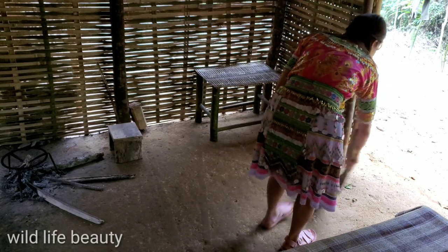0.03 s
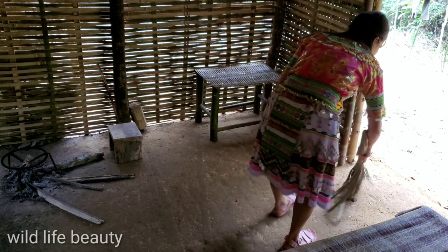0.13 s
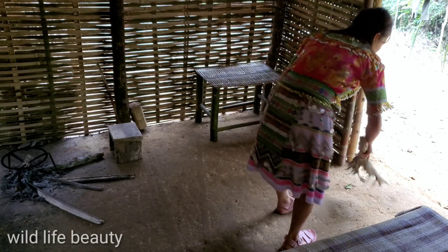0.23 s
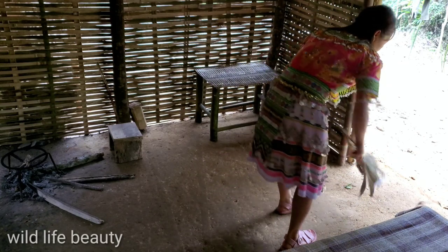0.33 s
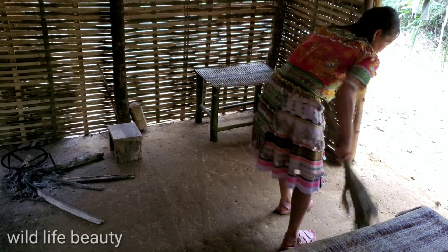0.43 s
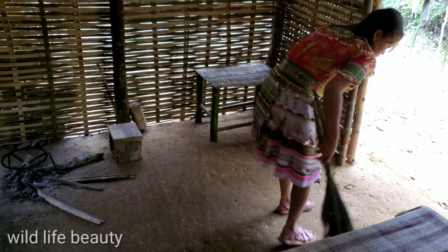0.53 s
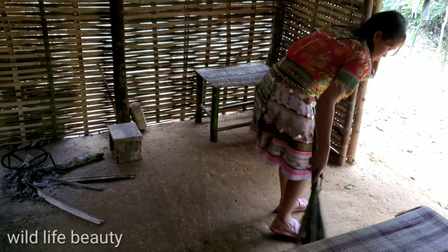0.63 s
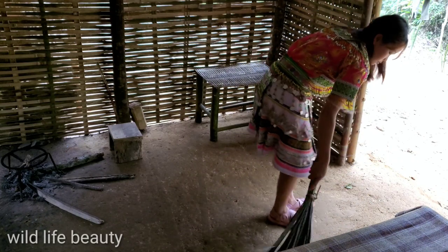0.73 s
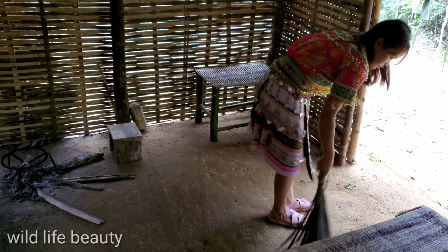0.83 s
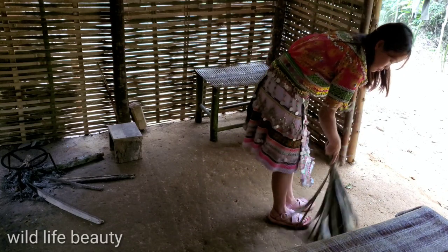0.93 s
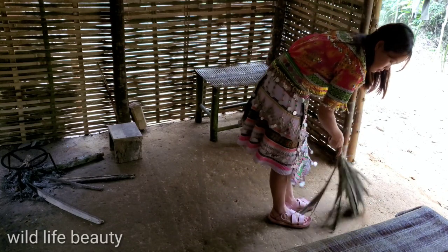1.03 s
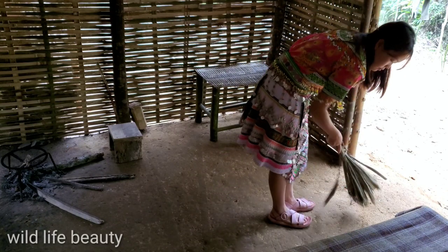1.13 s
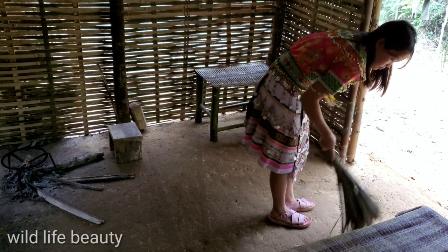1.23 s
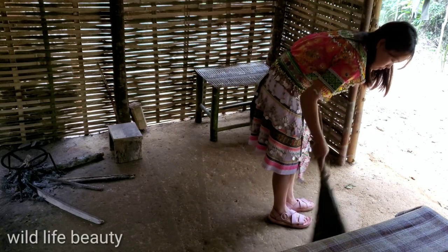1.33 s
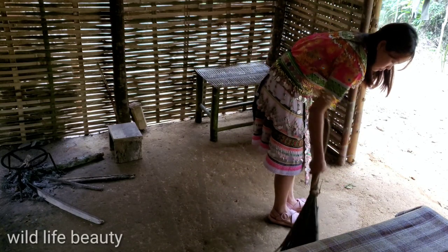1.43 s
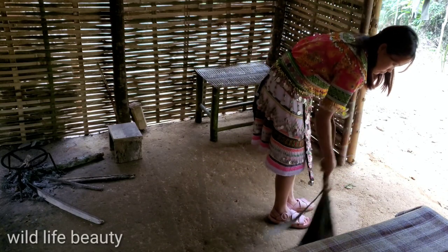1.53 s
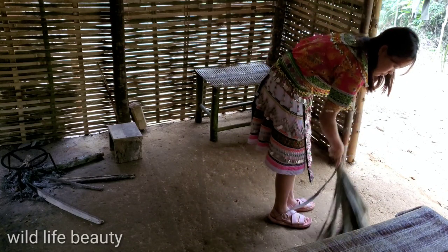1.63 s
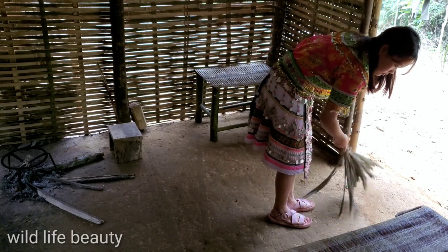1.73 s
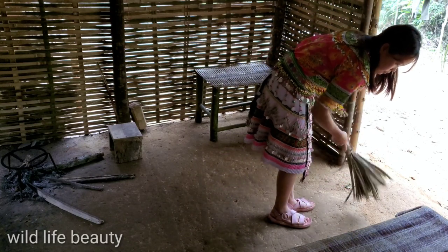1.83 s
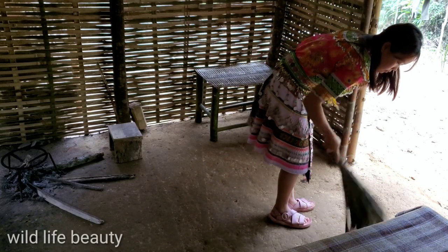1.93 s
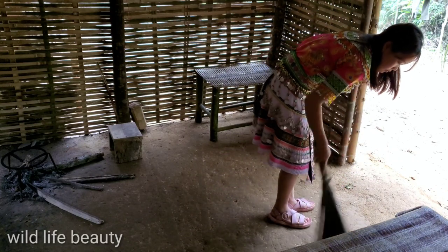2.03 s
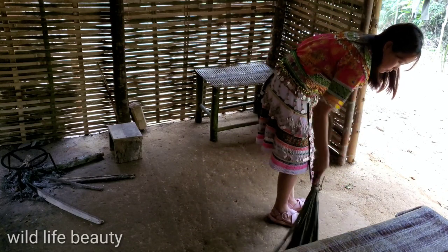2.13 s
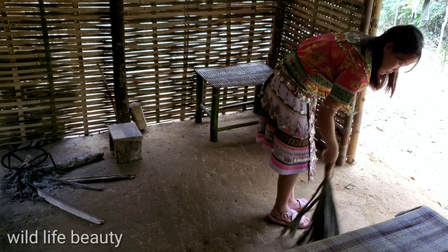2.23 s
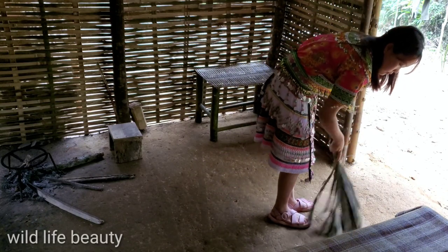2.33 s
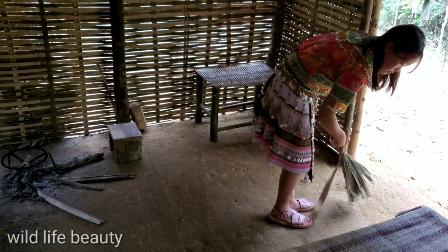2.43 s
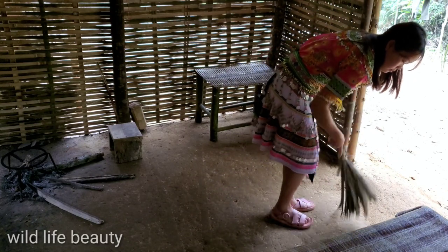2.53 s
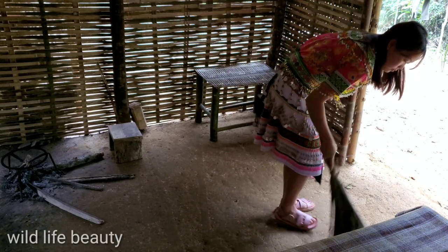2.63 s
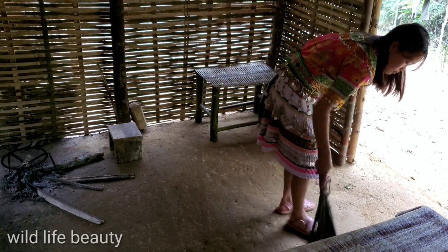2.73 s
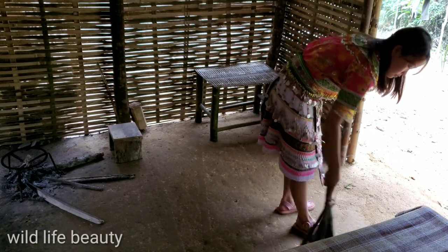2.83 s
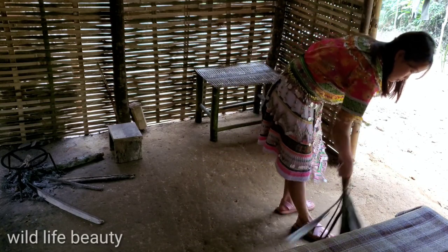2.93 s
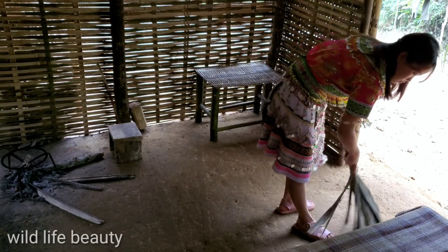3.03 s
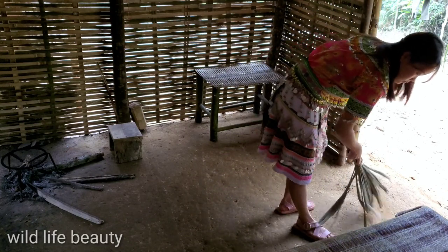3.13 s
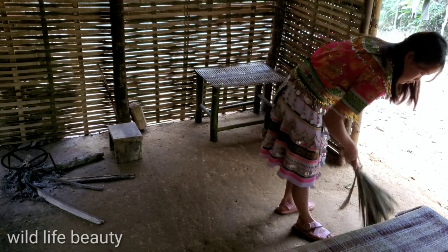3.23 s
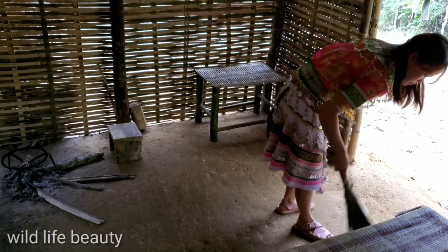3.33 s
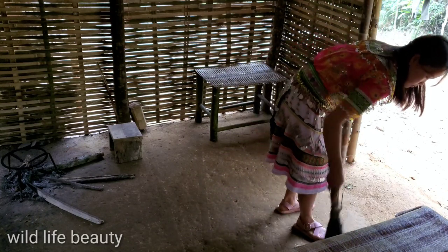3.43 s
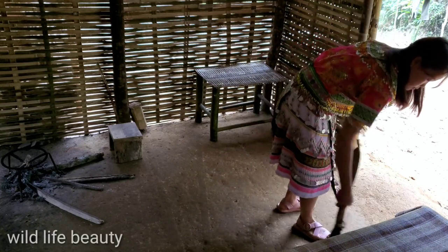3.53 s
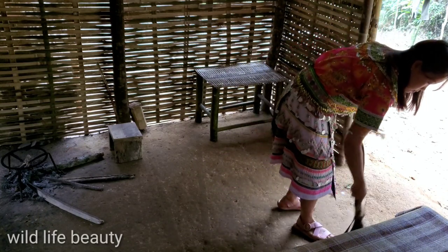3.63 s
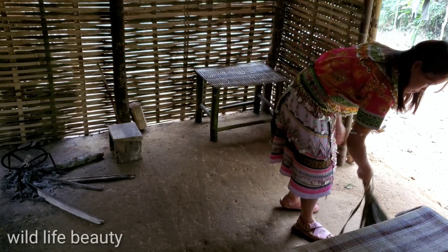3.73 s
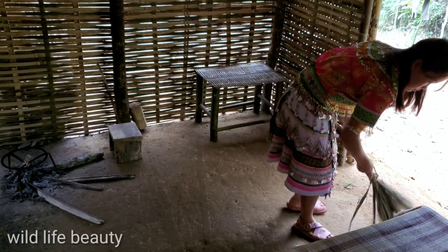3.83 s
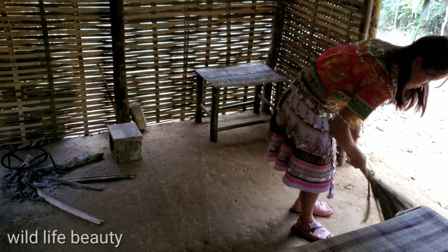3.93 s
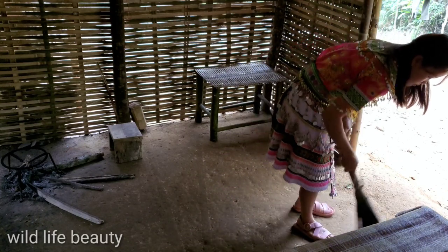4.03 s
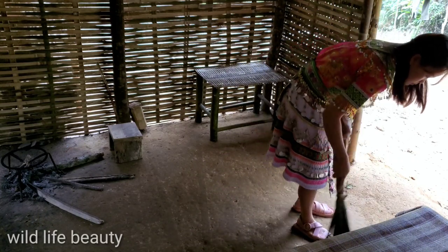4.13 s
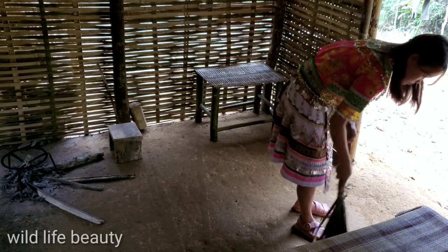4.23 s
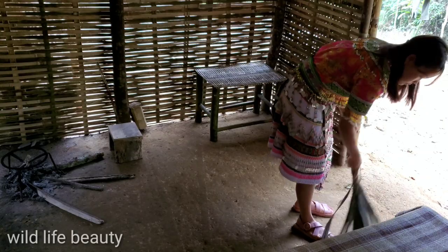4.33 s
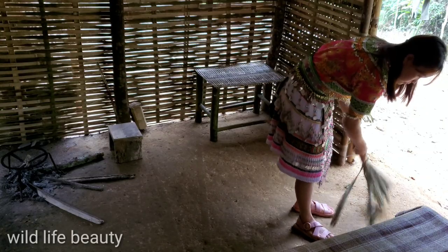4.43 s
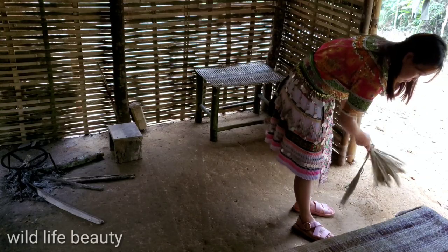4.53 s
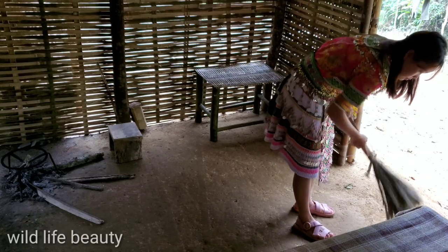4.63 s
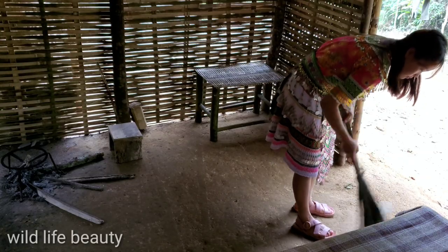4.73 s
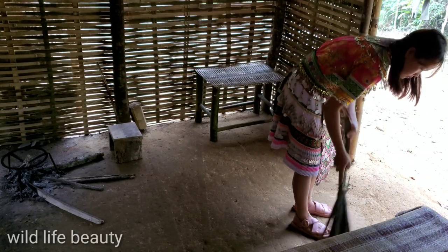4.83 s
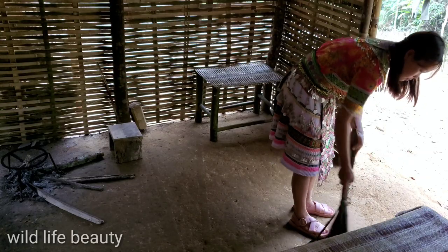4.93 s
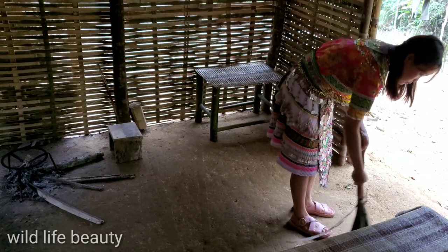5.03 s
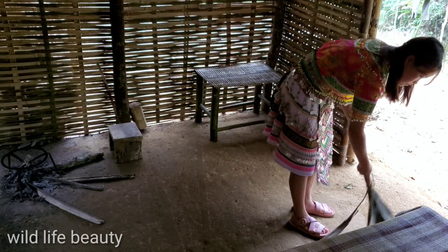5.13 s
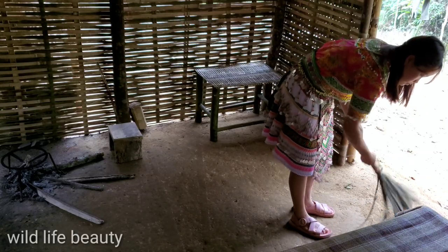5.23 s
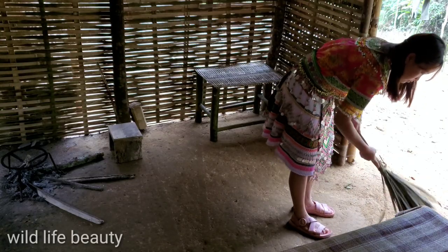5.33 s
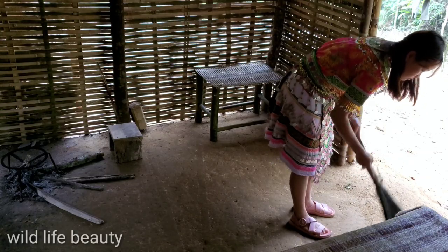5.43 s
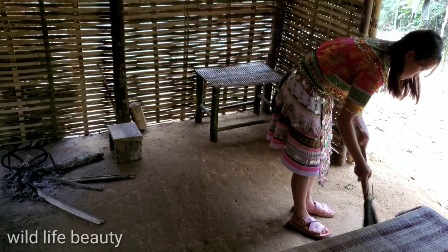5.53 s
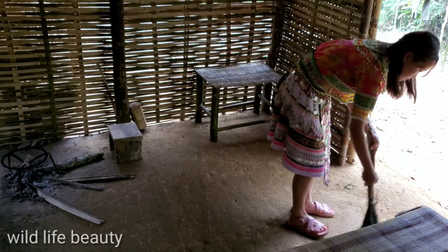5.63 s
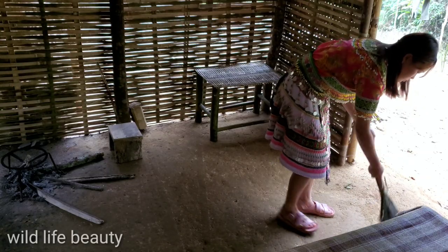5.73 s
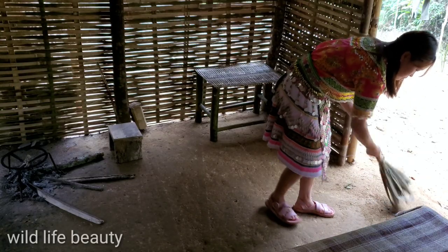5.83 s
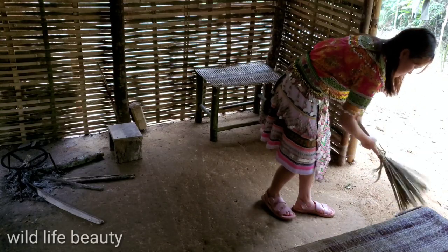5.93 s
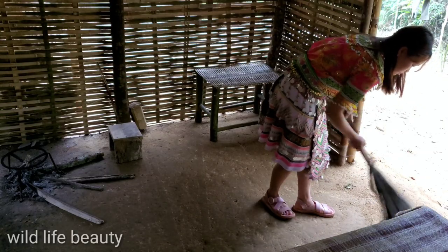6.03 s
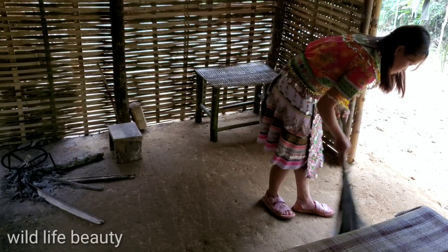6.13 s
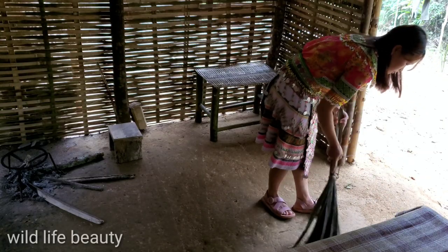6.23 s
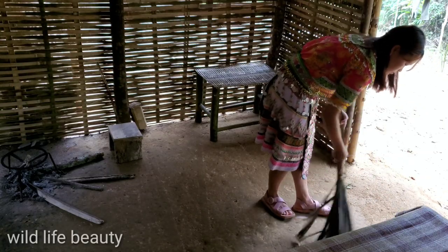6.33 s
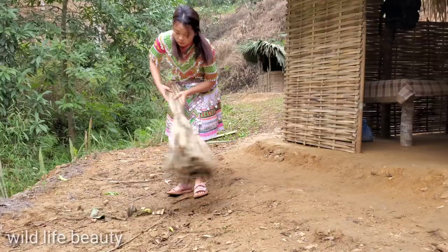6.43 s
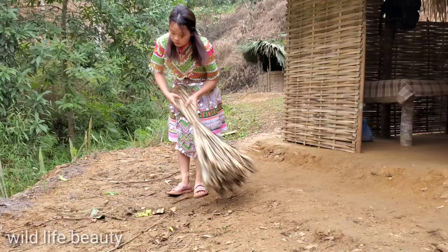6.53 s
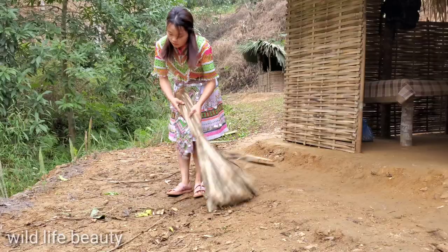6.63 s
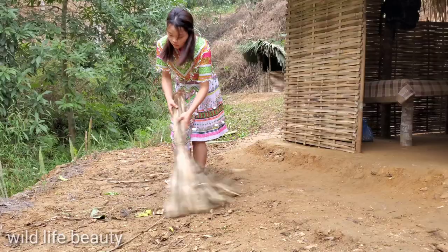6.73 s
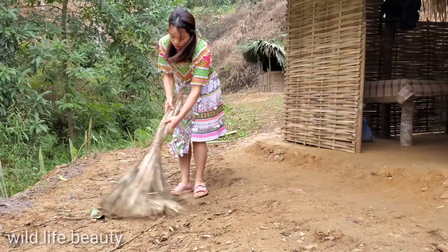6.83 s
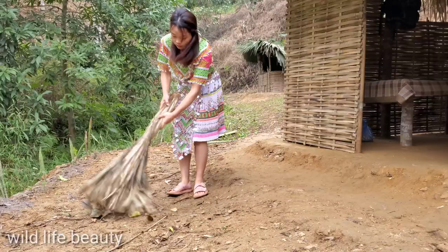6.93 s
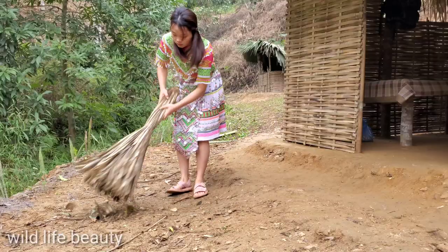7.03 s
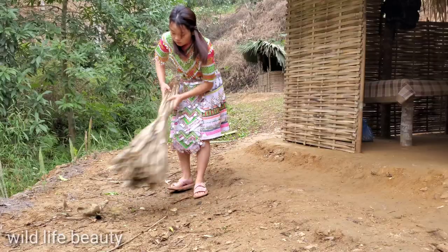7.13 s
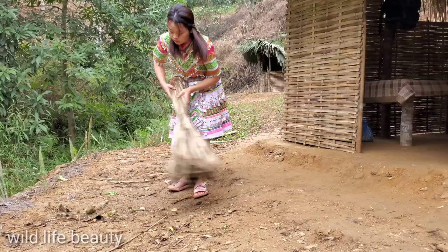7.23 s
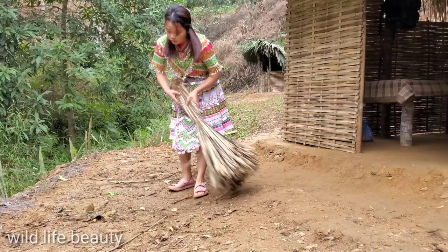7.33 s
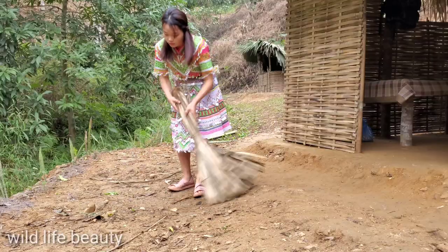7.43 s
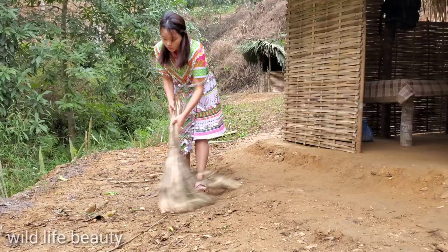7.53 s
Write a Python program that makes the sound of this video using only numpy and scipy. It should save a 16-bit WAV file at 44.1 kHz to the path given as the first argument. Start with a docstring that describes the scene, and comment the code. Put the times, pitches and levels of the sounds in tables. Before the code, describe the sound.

Close stereo sound in a small woven hut: a soft grass broom brushes packed dirt about every 0.7 seconds. Each swish swells and eases, often ending in a crackly flick with a soft thud. Between strokes cloth rustles and tiny metal spangles shimmer faintly. After 6.6 seconds, two heavier, rougher sweeps follow in an open yard, with clod crunches and dull footfalls over quiet outdoor air.

```python
'''A grass broom sweeps packed dirt: steady strokes in a bamboo hut, then two with a bigger broom in the yard.
Each stroke is noise and tiny clicks shaped by the push: it lands, swells, eases off and lifts.
Straws often snag near the end of a hut stroke and spring free with a flick: a spray of clicks and a thud.
Between strokes the skirt rustles (soft noise) and its metal spangles shimmer (many short rings).
In the yard feet pad on the earth (short low tones); quiet outdoor noise lies under everything.'''
import sys
import numpy as np
from scipy import signal
from scipy.fft import rfft
from scipy.io import wavfile
from scipy.ndimage import uniform_filter1d

SR = 44100
rng = np.random.default_rng(int(sys.argv[2]) if len(sys.argv) > 2 else 0)


def generate_wav(sig):
    """Save sig (samples, or channels by samples) to the path in sys.argv[1] as 16-bit PCM at SR."""
    pcm = np.round(np.clip(np.atleast_2d(sig).T, -1, 1) * 32767).astype(np.int16)
    wavfile.write(sys.argv[1], SR, pcm)


N = 334719
TIME = np.arange(N) / SR  # seconds

# Levels in these tables are settings; the functions below may shift them.
# Broom strokes, or a brief second contact within one: [start t/s, landing t/s, time to hardest push t/s,
# length t/s, lifting t/s, level/dB, easing after the push level/dB, low scrape level/dB,
# extra scrape on landing level/dB, fizz level/dB]
HUT_STROKES = [ (-0.04, 0.027, 0.16, 0.24, 0.16, -37.5, 3.5, -7.5, 0, -6.5),
               (0.824, 0.026, 0.043, 0.32, 0.14, -38, 4, -1, 2.5, -6),
               (1.517, 0.087, 0.15, 0.27, 0.14, -36, 5.5, -3, 1, -6),
               (2.188, 0.045, 0.1, 0.31, 0.13, -38.5, 3, -4, 6.5, -6),
               (2.888, 0.025, .12, 0.32, 0.12, -38.5, 4, -1.5, 3.5, -5),
               (3.595, 0.058, 0.14, 0.34, 0.13, -37.5, 9, -1, 4.5, -6),
               (4.257, 0.037, 0.14, 0.29, 0.14, -37, 7.5, -3.5, 4.5, -6),
               (4.945, 0.044, 0.22, 0.4, 0.068, -40, 3.5, -2.5, -1, -6),
               (5.609, .095, 0.12, 0.23, 0.045, -39, -1, -3, 7, -7.5),
               (5.848, 0.022, 0.085, .11, 0.18, -46.5, 6, -6, -1, -3),
               (6.253, 0.074, 0.072, .26, 0.11, -43, 0, 1, -11, -6), ]
YARD_STROKES = [ (6.617, .04, 0.14, .485, 0.048, -40, 2.6, -5, 4, -7),
                (6.804, .025, .03, 0.064, 0.05, -43, 3.4, 3.5, 2, -2),
                (7.416, 0.037, 0.14, 0.34, .1, -37.5, 2.6, -4.5, -1.5, -8), ]
# Bent straws spring free: [t/s, level/dB, bass thud against the spray level/dB, length t/s]
FLICKS = [(1.148, -28, -27, 0.046), (1.799, -24.5, -30, 0.036), (2.482, -30, -37, 0.026),
          (3.1842, -28.5, -48, 0.037), (3.904, -27, -26, 0.051), (4.5288, -25.5, -34, 0.041)]
# A single straw or spangle snaps: [t/s, level/dB, time to fall 60 dB t/s]
TICKS = [(0.303, -32, 0.03), (0.3082, -25, 0.047), (0.466, -35, 0.04), (0.694, -34, 0.04),
         (0.732, -32, 0.04), (1.231, -29, 0.056), (1.366, -19.5, 0.035), (2.259, -17.5, 0.079),
         (3.351, -43, 0.036), (4.09, -34, 0.043), (4.663, -34, 0.044), (7.1931, -31, 0.04)]
# The broom catches on clods in the yard: [t/s, level/dB, time to fall 60 dB t/s]
CLODS = [(6.636, -34.5, 0.08), (6.827, -27, 0.079), (7.099, -46, 0.08), (7.417, -32.5, 0.07),
         (7.446, -30, 0.059)]
# Soft footfalls: [t/s, level/dB, f/Hz, time to fall 60 dB t/s]
STEPS = [(6.925, -57, 72.4, 0.22), (7.054, -41, 135, 0.031), (7.189, -39.5, 138, 0.029),
         (7.218, -52, 120, .05), (7.436, -49.5, 90, 0.082), (7.505, -62, 70, .08)]
# The skirt swings as the broom returns: [start t/s, length t/s, spangles level/dB, cloth level/dB,
# extra rustle of reaching for the next stroke level/dB]
SWINGS = [ (0.35, 0.43, -48.5, -61, 5), (1.217, 0.16, -47.5, -62, 4), (1.885, 0.16, -54, -59.5, 3),
          (2.58, 0.23, -55, -62.5, 6.5), (3.27, 0.28, -48, -60.5, 5.5), (3.993, 0.22, -54.5, -60, 6.5),
          (4.663, 0.24, -57.5, -61, 7), (5.392, 0.22, -61, -63.5, 6), (5.99, 0.27, -58.5, -63.5, 5.5),
          (7.177, .23, -56.5, -57.5, 1.5), ]

# How strong each pitch is in a sound: [f/Hz, level/dB]
HUT_DIRT = [(40, -39), (100, -18), (170, -6), (300, -5), (500, -3.5), (700, 1.5), (1000, -1), (1400, -0.2),
            (2200, -1.5), (2900, 1.5), (3700, -1), (6000, -5), (12000, -10), (15500, -13)]
YARD_DIRT = [(30, -34), (80, -19), (150, -13), (220, -7.5), (300, -8), (600, 2.5), (1000, -3), (1450, 2),
             (2000, -6), (2400, -8), (4200, -3.5), (6700, -12), (12000, -12.5), (15500, -16.5)]
FLICK_SPECTRUM = [(60, -36.5), (160, -0.5), (320, -5.5), (500, -13.5), (1000, -6), (1600, -4.5), (2700, 0),
                  (4000, 0), (6000, -2), (10000, -4.5), (15500, -5)]
TICK_SPECTRUM = [(200, -26), (1500, -16), (3000, 0), (7000, -2), (11000, 0.5), (15500, 1.5)]
CLOTH_SPECTRUM = [(100, -13), (300, 2.5), (700, 1), (1000, -4), (2500, 1), (4500, 1), (6500, -2.5),
                  (11000, -2), (15500, -5)]
AIR_SPECTRUM = [(25, -25), (50, -9), (75, 4), (130, -5.5), (190, 0), (300, 5), (420, -9), (580, -5),
                (710, 4), (950, -4), (1600, -0.5), (3000, -7), (7000, -9.5), (15500, -7.5)]
# Pitches that the hut and the yard lift or weaken in the scrape: [f/Hz, width f/Hz, level/dB]
HUT_COLOUR = [(196, 37, 6), (252, 37, -21), (303, 36, 11.5), (386, 33, -19.5), (432.4, 15, 7.5),
              (502, 30, -3.5), (576, 33, 6.5), (810, 33, 4), (930, 150, -3), (2600, 90, 2)]
YARD_COLOUR = [(400, 46, 5), (480, 32, -9), (706, 50, -2.5), (840, 87, 4), (1050, 70, -2.5),
               (1250, 95, 4.5), (1930, 120, 5.5), (3160, 70, 2)]
# Ring of the spangles: [f/Hz, scale of the spread among them f/Hz, level/dB, time to fall 60 dB t/s]
SPANGLE_MODES = [(9450, 420, -4, 0.067), (11930, 1200, -4.5, 0.011), (14400, 700, -2.5, .004)]
# How alike left and right are, from 0 to 1: [f/Hz, likeness]
HUT_SAME = [(60, 0.77), (130, 1), (290, 0.99), (640, 0.79), (1400, 0.35), (3000, 0.05), (15000, 0.025)]
YARD_SAME = [(60, 0.84), (130, 0.85), (290, 0.97), (640, 0.85), (1400, 0.3), (3000, 0.038), (15000, .05)]
# Bands of the scrape, the swish and the fizz: [lowest f/Hz, highest f/Hz]
BANDS = [(400, 1800), (2200, 8000), (10500, 15500)]
# How much each pitch follows the pressure, and the fine tips: [f/Hz, share]
SCRAPE_SHARE = [(100, 0.18), (300, 0.53), (600, 0.94), (1500, 0.71), (2600, 0.044), (4500, 0)]
FIZZ_SHARE = [(3500, -0.34), (6000, 0.21), (11000, 1)]
# How much each pitch takes the colour of the spot of ground: [f/Hz, share]
SPOT_SHARE = [(1500, 0.9), (5000, 0.35)]

HUT_T60 = 0.16  # seconds for the hut's echo to fall 60 dB
EDGE_HZ = 15700  # top of the final frequency range
HUT_LAG_S, YARD_LAG_S = -.00017, .00004  # how much later the right side hears the broom (minus: earlier)
TOUCH_DB, LIFT_DB = 21, 24.5  # how quiet a stroke's first touch is; fall over one lifting time
UNLOAD_S = 0.15  # time for the hand to take its weight off the broom after the push
BITE_S = 0.079  # how fast the stems' bite into the dirt fades after landing
STROKE_SPAN_S = .65  # each stroke is computed for this long
SNAG_DB, SNAG_S = 4, .02  # depth and time of the scrape's stall before a flick
SPANGLE_BUILD_DB = 2.5  # rise of the spangles up to the middle of a swing
CLOTH_SLACK_DB = 5  # fall of the cloth from the start of a swing to its middle


def gain_of(db):
    """Turns decibels into a multiplier."""
    return 10 ** (np.asarray(db) / 20)


def evened(x):
    """Brings a sound to an average (rms) strength of 1."""
    return x / np.sqrt(np.mean(x ** 2) + 1e-20)


def read(points, hz):
    """Reads a curve between its points, with pitch on a logarithmic scale."""
    f, value = np.transpose(points)
    return np.interp(np.log(hz + 1), np.log(f + 1), value)


def add(mix, s, sound):
    """Adds a stereo sound at time s, or at the very start if s is negative."""
    part = mix[:, max(round(s * SR), 0):][:, :sound.shape[1]]
    part += sound[:, :part.shape[1]]


def coloured(x, points):
    """Shapes a short sound with a spectrum and evens its strength."""
    size = x.shape[-1]
    gains = gain_of(read(points, np.fft.rfftfreq(size, 1 / SR)))
    return evened(np.fft.irfft(rfft(x) * gains, size))


def coloured_by(x, points):
    """Filters a whole layer with gains in dB, without evening it."""
    size = 2 ** 19
    gains = gain_of(read(points, np.fft.rfftfreq(size, 1 / SR)))
    return np.fft.irfft(rfft(x, size) * gains)[:, :N]


def grit(size, per_s, spread_db, share):
    """Makes three streams of tiny stick-slip clicks of uneven size over a bed of countless smaller ones."""
    sizes = gain_of(spread_db * np.minimum(rng.exponential(1, (3, size)), 4))
    signs = rng.choice([-1, 1], (3, size))
    clicks = sizes * signs * (rng.random((3, size)) < per_s / SR)
    share = np.clip(share, 0, 1)
    bed = rng.standard_normal((3, size))
    return np.sqrt(share) * evened(clicks) + np.sqrt(1 - share) * bed


def pair(streams, same, lag_s):
    """Makes stereo: one stream reaches both sides, shifted on the right; two others are scattered sound."""
    size = streams.shape[1]
    hz, z = np.fft.rfftfreq(size, 1 / SR), rfft(streams)
    likeness = np.clip(read(same, hz), 0, 1)
    direct = z[2] * np.exp(-2j * np.pi * hz * np.array([[0], [lag_s]]))
    return np.fft.irfft(np.sqrt(likeness) * direct + np.sqrt(1 - likeness) * z[:2], size)


def lumps(shape, frames, bins):
    """Makes smooth random changes over time and pitch."""
    over_time = uniform_filter1d(rng.standard_normal(shape), max(round(frames), 1), 1)
    return evened(uniform_filter1d(over_time, max(round(bins), 1), 0))


def air():
    """Quiet outdoor background: shaped noise whose level gently wavers."""
    noise = pair(rng.standard_normal((3, N)), YARD_SAME, lag_s=0)
    bed = evened(coloured_by(noise, AIR_SPECTRUM))
    waver_db = 0.86 * lumps((1, N), frames=5300, bins=1)
    return bed * gain_of(-58.0 + waver_db)


def hut(x, wet_db):
    """Short echo of the woven walls: sparse random reflections that die away, most alike near 600 Hz."""
    t = TIME[:SR // 3]
    taps = rng.standard_normal((3, len(t))) * (rng.random((3, len(t))) < 4000 / SR)
    taps = pair(taps, [(200, 0.55), (600, 1.0), (1400, 0)], lag_s=0)
    taps = taps * (t > .004) * gain_of(-60 * t / HUT_T60)
    taps /= np.linalg.norm(taps, axis=1, keepdims=True)
    echo = signal.fftconvolve(x, taps, axes=1)[:, :N]
    return x + gain_of(wet_db) * echo


def footfalls():
    """Soles press on packed earth: a dull, low tone with a soft start that dies quickly."""
    out, t = np.zeros((2, N)), TIME[:SR // 4]
    for s, db, hz, t60 in STEPS:
        fading = gain_of(db + 5.0 - 60 * t / t60)
        push = fading * np.sin(2 * np.pi * hz * t) * (1 - np.exp(-t / 0.0026))
        add(out, s, np.array([push, push]))
    return out


def sway():
    """Levels of spangles and cloth in each swing: leaving the stroke, mid-swing, reaching for the next."""
    points = []
    for start, length, spangle_db, cloth_db, reach_db in SWINGS:
        points += [(start, spangle_db - SPANGLE_BUILD_DB, cloth_db + CLOTH_SLACK_DB),
                   (start + length / 2, spangle_db, cloth_db),
                   (start + length, spangle_db, cloth_db + reach_db)]
    return np.transpose(points)


def spangles():
    """Spangles knock together at random, each ringing briefly at its own pitches."""
    t, shimmer, count = TIME[:2048], np.zeros((2, N)), 40
    sizes = gain_of(4.5 * np.minimum(rng.exponential(1, N), 3.2))
    knocks = sizes * (rng.random(N) < 1100 / SR)
    which = rng.integers(0, count, N)
    # the spangles are nearly alike: most ring close to the middle pitch, a few lie far out
    detune = np.arctanh(np.linspace(-.97, .97, count))
    for k in range(count):
        ring = np.zeros((2, len(t)))
        for hz, spread, db, t60 in SPANGLE_MODES:
            cycles = (hz + spread * detune[k]) * t + rng.random((2, 1))
            ring += gain_of(db - 60 * t / t60) * np.sin(2 * np.pi * cycles)
        shimmer += signal.oaconvolve((knocks * (which == k))[None], ring, axes=1)[:, :N]
    return evened(coloured_by(shimmer, [(3000, -20), (7500, 16.5), (8700, 3.5), (15000, 4.5)]))


def skirt():
    """The swinging skirt: spangles shimmer over cloth that rustles with fine clicks and noise."""
    s, spangle_db, cloth_db = sway()
    rubbing = pair(grit(N, per_s=900, spread_db=1.5, share=0.38), HUT_SAME, HUT_LAG_S)
    cloth = evened(coloured_by(rubbing, CLOTH_SPECTRUM))
    folds_db = 2.35 * lumps((1, N), frames=1200, bins=1)
    bunches_db = 1.6 * lumps((1, N), frames=800, bins=1)
    # the spangles hang stiller outside the swings
    swings = sum((TIME > start - .06) & (TIME < start + length + .06) for start, length, *_ in SWINGS)
    swinging = uniform_filter1d(1. * swings, SR // 12)
    still_db = 6.0 * (1 - swinging)
    shimmer_db = np.interp(TIME, s, spangle_db) + bunches_db - still_db - 0.5
    rustle_db = np.interp(TIME, s, cloth_db) + folds_db + 4.0
    return spangles() * gain_of(shimmer_db) + cloth * gain_of(rustle_db)


def ticks():
    """Single straws or spangles snap: dry, bright bursts of noise that die at once."""
    out, t = np.zeros((2, N)), TIME[:4096]
    for s, db, t60 in TICKS:
        noise = pair(rng.standard_normal((3, len(t))), HUT_SAME, HUT_LAG_S)
        add(out, s, coloured(noise, TICK_SPECTRUM) * gain_of(db - 8.0 - 60 * t / t60))
    return out


def flicks():
    """The bent bundle springs straight: a sudden spray of straw clicks and a soft thud."""
    out, t = np.zeros((2, N)), TIME[:8192]
    thud_spectrum = [(45, -32), (100, -10), (175, -18), (320, 10), (600, 2), (3000, -60)]
    for s, db, thud_db, length in FLICKS:
        clicks = pair(grit(len(t), per_s=4400, spread_db=-1.5, share=0.29), HUT_SAME, HUT_LAG_S)
        spray = coloured(clicks, FLICK_SPECTRUM)
        noise = pair(rng.standard_normal((3, len(t))), HUT_SAME, HUT_LAG_S)
        thud = coloured(noise, thud_spectrum) * gain_of(thud_db + 7.0) * np.exp(-t / 0.023)
        slap = 0.55 * np.exp(-(t / 0.02) ** 2)
        settling = 0.88 * np.exp(-(t / (1.27 * length)) ** 2)
        sound = spray * (slap + settling) + thud
        onset = 1 - np.exp(-t / 0.00048)
        add(out, s - .001, gain_of(db - 6.5) * sound * onset)
    # slightly louder on the left, though it reaches the right side first
    return out * gain_of([[.6], [-.6]])


def snags():
    """Gain of the scrape as the straws catch before each flick and slide on after it."""
    stall = np.zeros(N)
    for s, *_ in FLICKS:
        stall += np.interp(TIME, [s - SNAG_S, s - SNAG_S / 10, s + SNAG_S / 10], [0, 1, 0])
    return gain_of(-SNAG_DB * stall)


def gesture(row, swell_db, unload_db, tips_db):
    """One stroke lands, swells and lifts; as the weight comes off, the scrape gives way to the fine tips."""
    start, landing, push, length, lifting, level_db, ease_db, scrape_db, bite_db, fizz_db = row
    t = TIME[(TIME >= start) & (TIME < start + STROKE_SPAN_S)] - start
    touch_db = TOUCH_DB * np.maximum(1 - t / landing, 0) ** 1.92
    drag_db = np.interp(t, [landing, push, length], [swell_db, 0, ease_db])
    lift_db = LIFT_DB * np.maximum(t - length, 0) / lifting
    speed_db = level_db - touch_db - drag_db - lift_db
    unloaded = np.clip((t - push) / UNLOAD_S, 0, 1)
    press_db = scrape_db + bite_db * np.exp(-t / BITE_S) - unload_db * unloaded
    return t + start, speed_db, press_db, fizz_db + tips_db * unloaded


def stroke(motion, grains, dirt, colour, patch_db, spot_db, flutter_db):
    """Straws drag over dirt: pressure swells the low scrape, the fine tips add fizz, tufts catch and slip."""
    s, speed_db, press_db, tips_db = motion
    during = (TIME >= s[0] - .5 / SR) & (TIME < s[-1] + .5 / SR)
    # cut the grains into short overlapping slices, so that each pitch can change over time
    hz, t, z = signal.stft(grains[:, during], SR, nperseg=1024, noverlap=896)
    shape_db = read(dirt, hz) + sum(db * np.exp(-((hz - f) / width) ** 2) for f, width, db in colour)
    power = gain_of(shape_db) ** 2
    low, mid, top = (10 * np.log10(np.mean(power * (hz > a) * (hz < b))) for a, b in BANDS)
    # scrape and fizz are set against the swish in the middle band
    scrape_db = np.interp(t + s[0], s, press_db) - low + mid
    fizz_db = np.interp(t + s[0], s, tips_db) - top + mid
    field_db = (shape_db - mid)[:, None] + np.outer(read(SCRAPE_SHARE, hz), scrape_db)
    field_db += np.outer(read(FIZZ_SHARE, hz), fizz_db)
    # single tufts sing out briefly; each spot of ground has its own slowly shifting colour
    field_db += patch_db * lumps(field_db.shape, frames=10, bins=11)
    field_db += spot_db * lumps(field_db.shape, frames=57, bins=2) * read(SPOT_SHARE, hz)[:, None]
    sound = signal.istft(z * gain_of(field_db), SR, nperseg=1024, noverlap=896)[1][:, :len(s)]
    flutter = flutter_db * lumps((1, len(s)), frames=1200, bins=1)
    return sound * gain_of(speed_db + flutter)


def clods():
    """The broom catches on clods: short crunches of noise with the colour of the yard's dirt."""
    out, t = np.zeros((2, N)), TIME[:8192]
    for s, db, t60 in CLODS:
        noise = pair(rng.standard_normal((3, len(t))), YARD_SAME, YARD_LAG_S)
        add(out, s, coloured(noise, YARD_DIRT) * gain_of(db - 6.0 - 60 * t / t60))
    return out


def yard_broom():
    """A bigger, stiff broom drags over rough ground and catches on clods."""
    out = clods()
    grains = pair(grit(N, per_s=3500, spread_db=3.5, share=0.44), YARD_SAME, YARD_LAG_S)
    for row in YARD_STROKES:
        motion = gesture(row, swell_db=3.0, unload_db=2.0, tips_db=1.5)
        add(out, row[0], stroke(motion, grains, YARD_DIRT, YARD_COLOUR,
                                patch_db=1.15, spot_db=1.5, flutter_db=1.05))
    tone = [(200, -0.24), (600, 1.1), (1500, 1.0), (4000, -0.13), (15000, 1.4)]
    # slightly louder on the right, though it reaches the left side first
    return coloured_by(out, tone) * gain_of([[-.6], [.6]])


def hut_broom():
    """A soft broom drags over a smooth floor, stalling briefly where straws snag."""
    out = np.zeros((2, N))
    grains = pair(grit(N, per_s=5000, spread_db=2.5, share=0.45), HUT_SAME, HUT_LAG_S)
    for row in HUT_STROKES:
        motion = gesture(row, swell_db=2.0, unload_db=6.0, tips_db=1.5)
        add(out, row[0], stroke(motion, grains, HUT_DIRT, HUT_COLOUR,
                                patch_db=2.08, spot_db=2.14, flutter_db=0.47))
    tone = [(200, -0.5), (600, -2.26), (1500, 1.5), (4000, 2.0), (15000, 2.0)]
    # slightly louder on the left, though it reaches the right side first
    return snags() * coloured_by(out, tone) * gain_of([[.6], [-.6]])


def scene():
    """Brooms, skirt and footfalls over the background; the hut echoes what happens inside it."""
    inside = TIME < YARD_STROKES[0][0]
    snaps, rustle = ticks(), skirt()
    sweeping = hut_broom() + flicks() + snaps * inside
    indoors = hut(sweeping, wet_db=-12.0) + hut(rustle * inside, wet_db=-3.5)
    outdoors = yard_broom() + footfalls() + gain_of(2.6) * (snaps + rustle) * ~inside
    return indoors + outdoors + air()


def record(dry):
    """Removes the highest frequencies, above the band edge."""
    low_pass = signal.firwin(511, EDGE_HZ, window=("kaiser", 9), fs=SR)
    return signal.oaconvolve(dry, low_pass[None], "same")


dry = scene()
out = record(dry)
generate_wav(out)
```